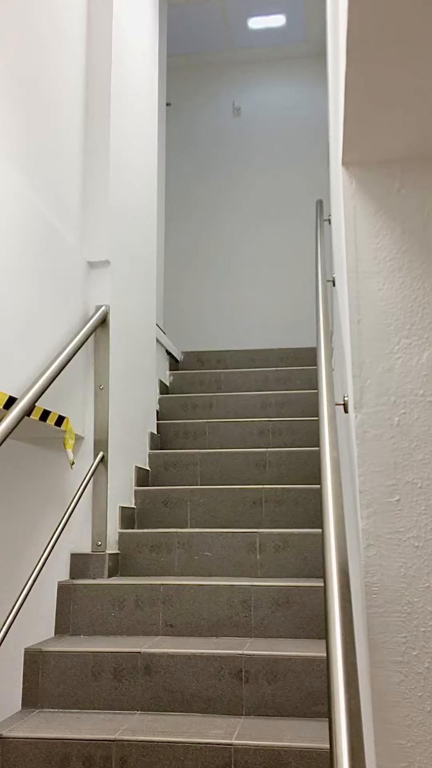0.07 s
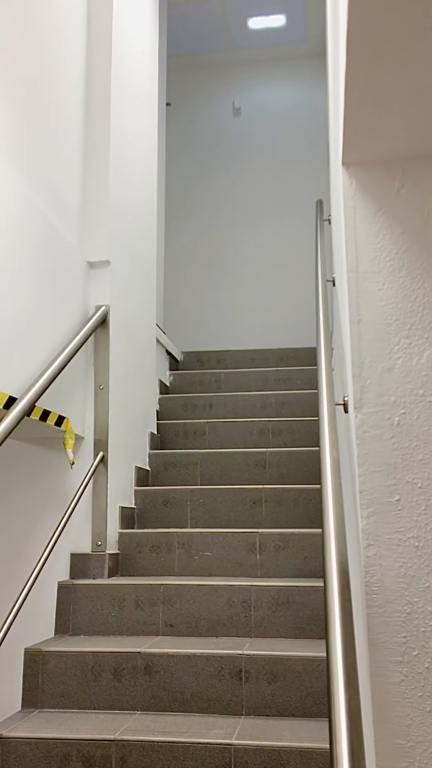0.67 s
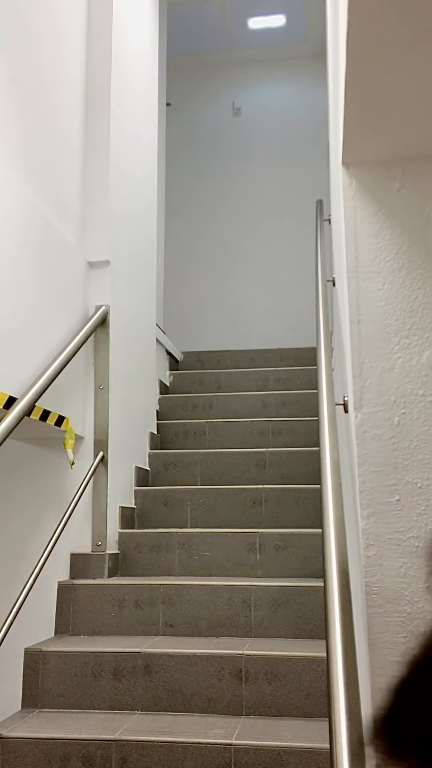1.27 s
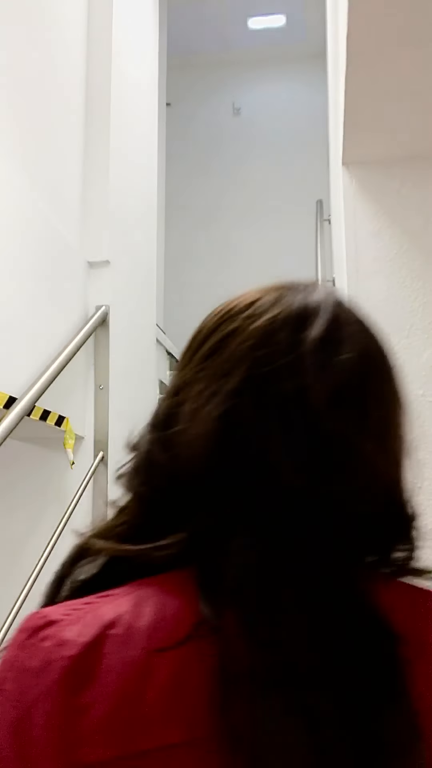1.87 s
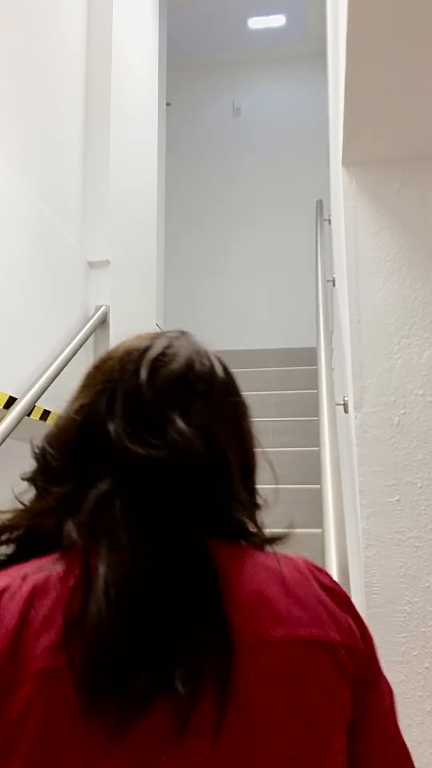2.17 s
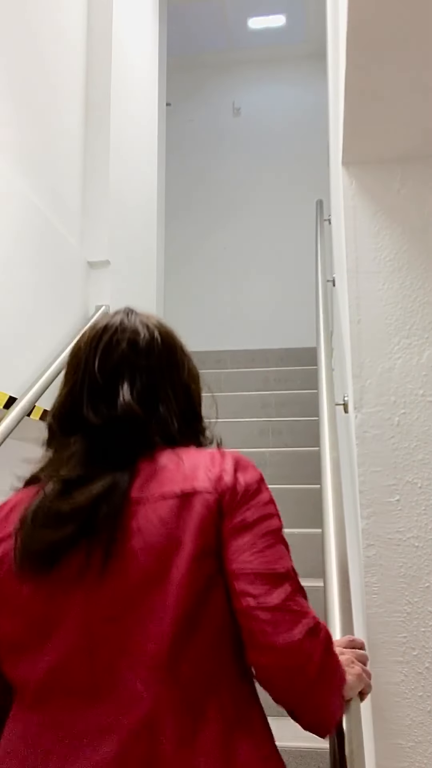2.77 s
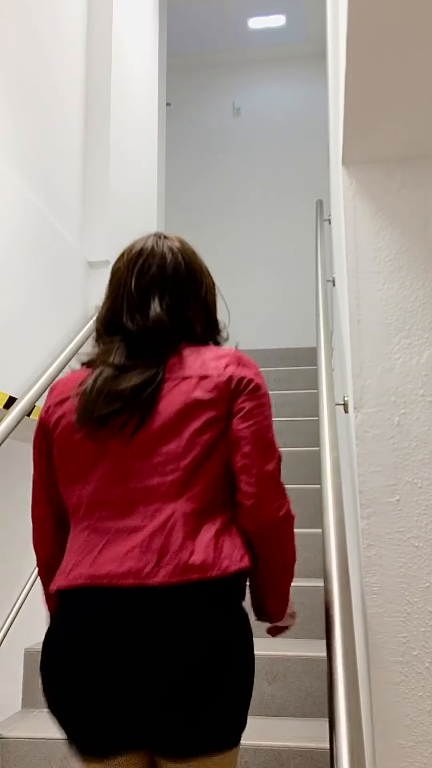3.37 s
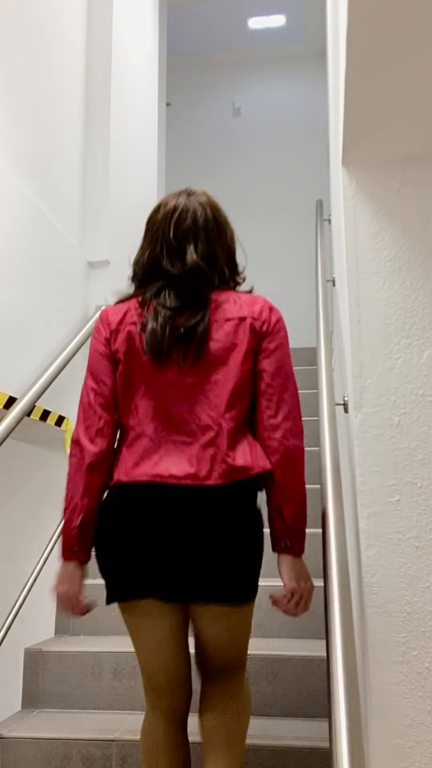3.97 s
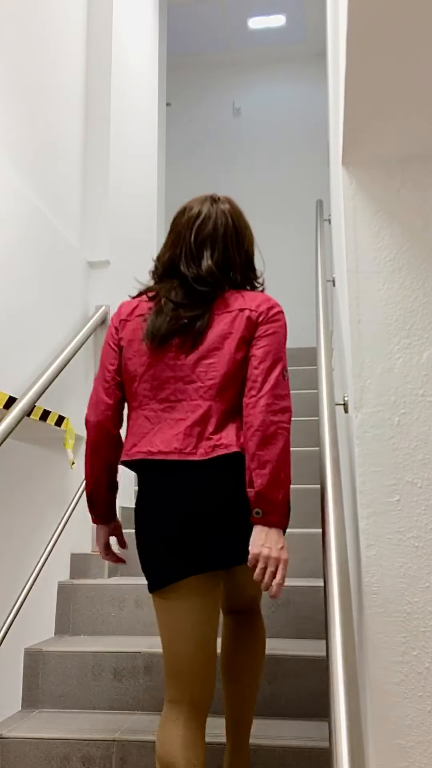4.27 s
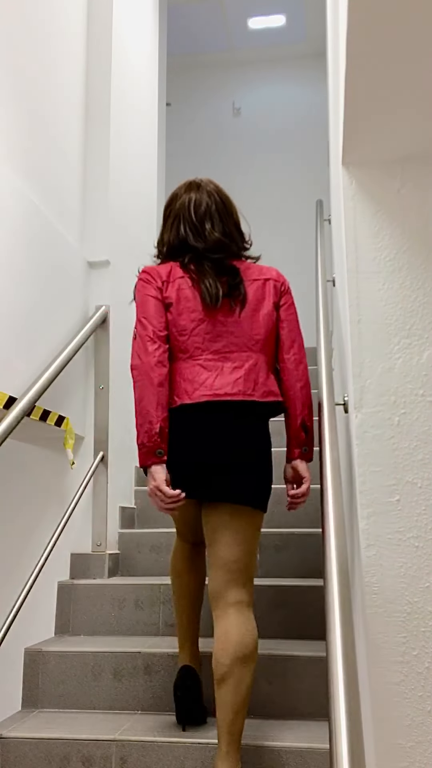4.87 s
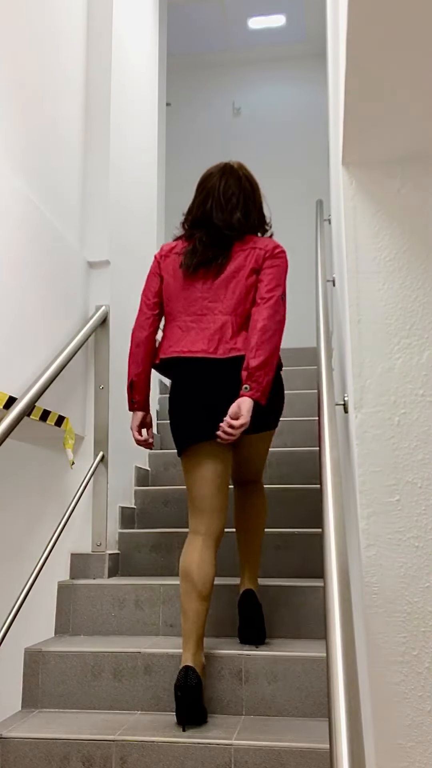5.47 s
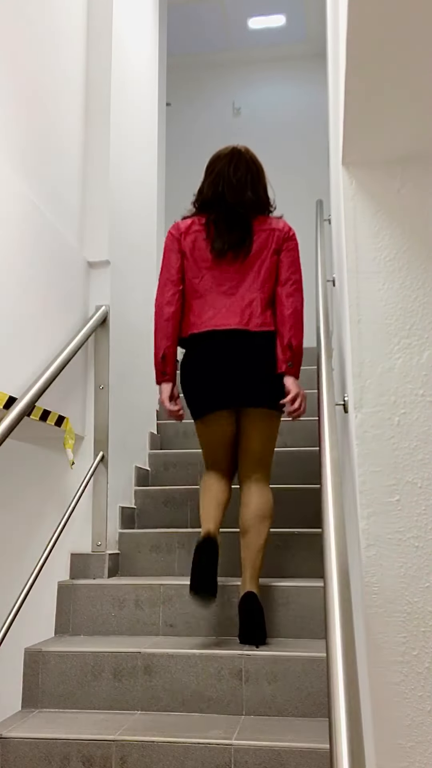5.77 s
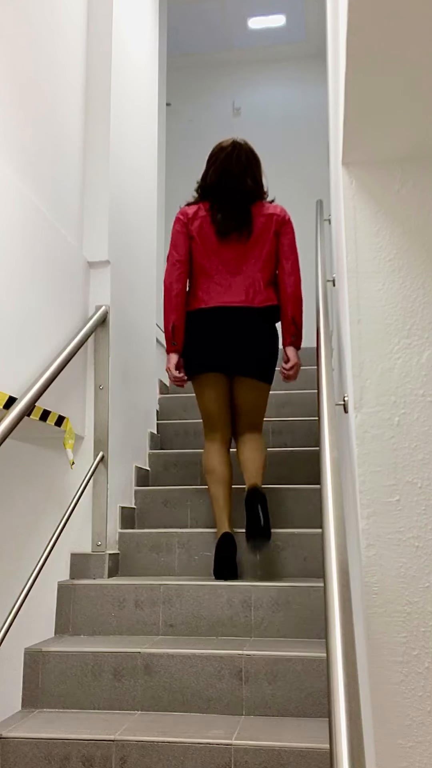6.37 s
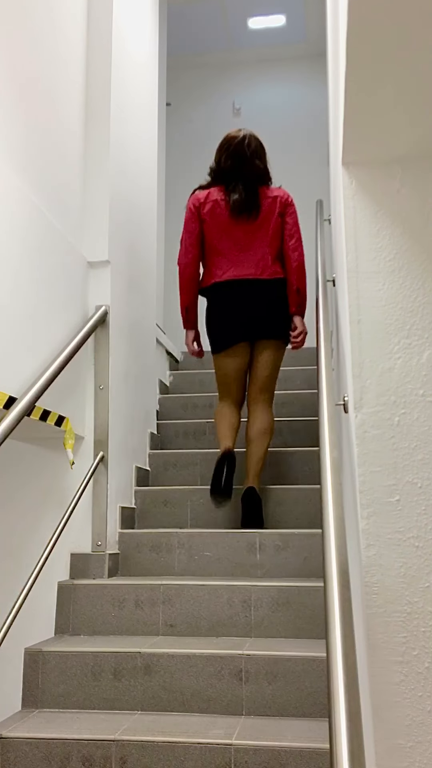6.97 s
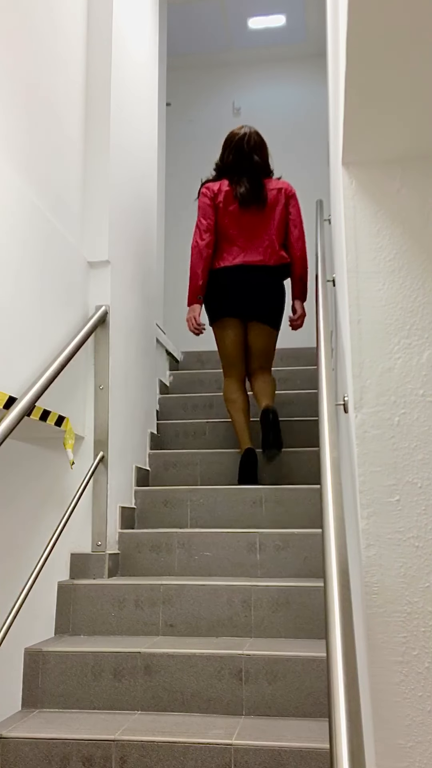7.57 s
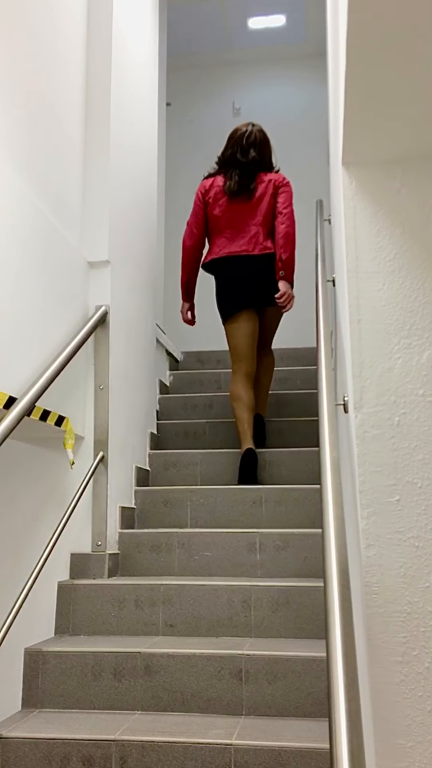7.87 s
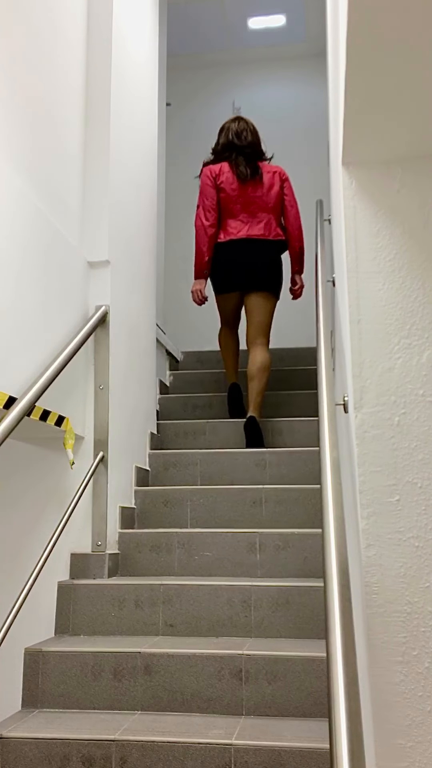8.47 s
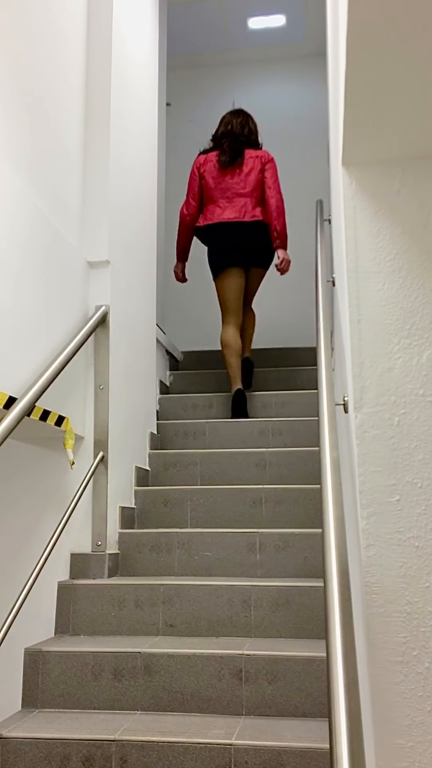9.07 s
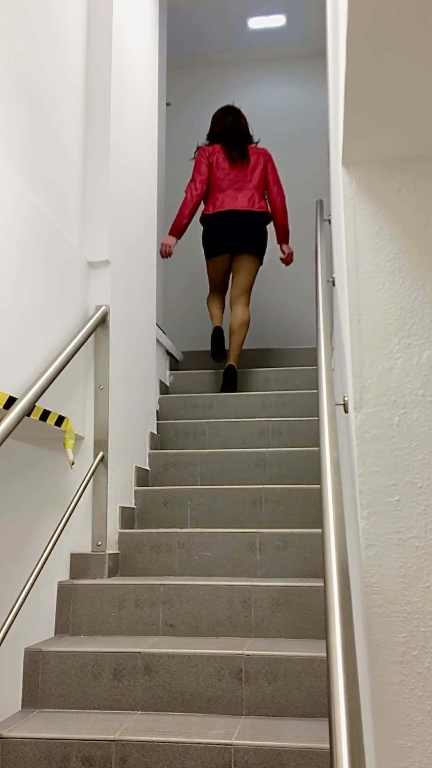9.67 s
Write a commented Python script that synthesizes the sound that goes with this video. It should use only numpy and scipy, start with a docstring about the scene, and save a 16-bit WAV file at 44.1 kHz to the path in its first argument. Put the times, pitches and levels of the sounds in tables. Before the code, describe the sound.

High heels pass close by and climb hard stairs in an echoing stairwell, with clothes swishing over a low hum.

```python
"""High heels pass close by and climb tiled concrete stairs in a hard, ringing stairwell.
Each footfall is a tap, sole thud plus heel click, and a second contact as the shoe settles.
Soles scuff the tile, clothes swish with each stride, and shoes and clothing give off small ticks.
A hand slides along the steel rail and makes it hiss. Under it all lies the building's low hum."""
import sys
import numpy as np
from scipy import signal
from scipy.fft import rfft, irfft, next_fast_len
from scipy.io import wavfile
from scipy.ndimage import uniform_filter1d

SR = 44100
rng = np.random.default_rng(int(sys.argv[2]) if len(sys.argv) > 2 else 0)


def wrap_up_sound(samples):
    """Save the sound to the file named by the first command line argument, as 16-bit audio."""
    columns = np.atleast_2d(samples).T
    # keep every value between -1 and 1, then stretch to whole-number steps
    tamed = np.clip(columns, -1, 1)
    steps = np.round(tamed * 32767).astype(np.int16)
    wavfile.write(sys.argv[1], SR, steps)


N = 428652
T = np.arange(N) / SR

# The stairwell's reverb tail. Each row: frequency in Hz, seconds to die away by 60 dB.
REVERB_TIMES = [(100, 0.5), (300, 0.88), (700, 1), (1400, 0.85), (2500, 0.87), (5000, 0.75), (9000, 0.43),
                (15000, 0.52)]
# How far the shoes are from the listener. Each row: time in seconds, distance in metres.
DISTANCE_PATH = [(1, 0.49), (3, 3.8), (3.6, 1.1), (5.4, 2.4), (9.1, 6.8)]
# Tone of the building's air. Each row: frequency in Hz, level in dB.
AIR_EQ = [(15, -49), (25, -5), (42, -1), (66, 3.5), (80, -16), (129, -4.5), (215, -5), (300, -11),
          (430, -16), (895, -19), (1500, -21), (3260, -28.5), (4500, -33), (7000, -33), (15500, -37.5)]
# Slow drift of the air noise. Each row: time in seconds, level in dB.
AIR_FADER = [(0, -52.5), (.9, -49.5), (1.6, -52), (3.4, -49), (6, -51.5), (9.7, -52.5)]
# Swells of the shaft's drone. Each row: centre in seconds, level in dB, half length in seconds.
DRONE_SWELLS = [(3.36, -44, 0.086), (3.65, -33, .05), (4.75, -37, 0.13), (6.5, -47.5, .3), (8.0, -35, 0.14)]
# A deep passing rumble. Its row: centre in seconds, level in dB, half length in seconds.
RUMBLE_SWELL = [(8.2, -44.5, 0.34)]
# Small knocks of shoes and clothing. Each row: start in seconds, level in dB, centre in Hz.
SMALL_TICKS = [(0.249, -10.5, 3730), (0.252, -15.5, 9000), (0.312, -10, 1360), (.445, -19.5, 3950),
               (.835, -10, 800), (1.192, -12.5, 3530), (1.199, -26, 6000), (1.819, -5, 690),
               (2.476, 11, 344), (2.983, -9, 2270), (3.243, -17, 8000), (3.592, 19.5, 292),
               (4.798, -18, 7450), (6.124, -25, 8000), (8.466, -27, 5940), (9.649, -18, 9200)]
# Clothes swish and brush as the walker passes close by and turns onto the landing.
# Each row: centre in seconds, level in dB, half length in seconds.
CLOTH_BRUSHES = [(.85, -60, .09), (1.382, -55, 0.16), (1.76, -56, 0.11), (1.85, -46, 0.074),
                 (1.99, -55.5, .17), (2.496, -54.5, 0.091), (2.765, -53.5, 0.094), (3.04, -60, 0.16),
                 (9.55, -52.5, .11)]
# The jacket's bright sheen. Each row: time in seconds, strength from 0 to 1.
SHEEN_FADER = [(1.1, 0), (1.7, 1), (3, 1), (4, 0), (7.5, 0.9), (8.2, .15)]
# Tone of rubbing fabric. Each row: frequency in Hz, level in dB.
CLOTH_EQ = [(300, -20), (1200, 7.5), (2800, 1.5), (4500, -1), (9000, 0), (12000, -2), (16000, -3)]
# The steps. Each row: start in seconds, thud in dB, thud cut-off in Hz, heel click in dB, low ring in Hz,
# its lift in dB, high ring in Hz, settling delay in seconds, settling in dB relative to the tap.
STEPS = [(1.057, 15, 212, -37, 330, 11, 820, 0.00795, -4), (1.734, 19, 147, -22, 267, 7.5, 530, 0.076, -9),
         (2.306, 6, 377, 5, 240, 9.5, 1250, .043, -20), (2.971, 15.5, 190, -3, 224, -0.5, 518, .014, 3.5),
         (3.602, 30, 520, 1.5, 292, 10.5, 694, 0.012, -10),
         (4.216, 13, 571, 8.5, 280, 12, 1316, .013, -2.5), (4.773, 31, 252, -5, 379, 6, 568, .015, -8),
         (5.417, 22.5, 416, 8.5, 230, 5, 796, .007, 0.5), (5.957, 18.5, 441, -2, 303.5, 16, 566, .019, 0.5),
         (6.628, 19.5, 440, 4.5, 224, 3, 1200, .0045, 1.5), (7.175, 24.5, 223, 4, 351, 7.5, 625, .028, 2.5),
         (7.853, 13.5, 171, -2, 291, 8, 710, 0.013, 3.5), (8.492, 15, 215, 4.5, 243, 5.5, 1900, .02, 0),
         (9.096, 22.8, 235, -8, 329, 5, 430, 0.031, 4)]
# Sole on the tread, before the contact softens it. Each row: frequency in Hz, level in dB.
THUD_EQ = [(25, -26), (70, -24.5), (130, -13), (320, 1), (650, 6), (1200, 10.5), (2400, 0), (5000, -4),
           (16000, 15)]
# Heel tip on the tile. Each row: frequency in Hz, level in dB.
CLICK_EQ = [(25, -45), (130, 4.5), (320, -8), (650, -0.5), (1200, 5.5), (2400, 0), (4200, -8.5),
            (5600, -11), (7000, -14), (11000, -19.5), (16000, -26)]
# The heel tip's first touch in a hard click. Each row: frequency in Hz, level in dB.
SNAP_EQ = [(25, -40), (700, -22), (2500, -4), (5500, -8), (9000, -9), (12000, -18), (16000, -25)]
# Modes and nulls of the flight and its shaft. Each row: centre in Hz, width in Hz, lift in dB.
STAIR_MODES = [(98, 27, 4.5), (139, 19, 10), (187, 33, -9), (223, 37, 7.5), (284.3, 52, -7.5),
               (310.8, 32, 7), (389.6, 7.2, 5.5), (468, 18, -4.5), (662.5, 24, 6), (745, 8.5, 2.5),
               (807, 7.2, 2), (1025, 36, 3.5), (1113, 22, 0.5), (1316, 75, 0)]
# The heel's stem, rung by one square strike. Each row: centre in Hz, width in Hz, lift in dB.
HEEL_MODES = [(610, 52, 4.5), (1034, 53, 11), (1790, 106, 16), (2240, 110, 11.5), (2820, 72, 3),
              (3020, 76, 14)]
# The hand's stroke along the rail. Each row: time in seconds, level in dB.
SLIDE_FADER = [(1.9, -66), (2.02, -57), (2.1, -48.5), (2.17, -38), (2.24, -43.5), (2.3, -42.5), (2.4, -45),
               (2.55, -77)]
# Tone of a hand rubbing steel. Each row: frequency in Hz, level in dB.
RUB_EQ = [(900, -55), (1500, -12), (2600, -13), (5000, -15.5), (9000, -17.5), (10500, -25), (16000, -24)]
# Resonances of the steel tube. Each row: centre in Hz, width in Hz, lift in dB.
RAIL_MODES = [(1590, 120, -10), (3240, 27, 11.5), (4150, 140, 15.5), (5670, 440, 4.5), (7980, 170, 9),
              (8650, 300, 4), (12700, 150, 10), (13450, 300, 9)]
# Soles scraping. Each row: peak in seconds, level in dB, decay in seconds, tilt in dB per octave.
SOLE_SCUFFS = [(2.339, -28.5, 0.029, 0.5), (3.001, -48, 0.1, 10), (4.332, -42.5, .009, 14),
               (4.939, -57, .009, 13), (6.707, -44.5, 0.022, 8.5), (7.212, -41, .035, 12),
               (7.94, -53, 0.056, 8), (9.18, -47, 0.062, -8.5)]
# Tone of gritty friction on tile. Each row: frequency in Hz, level in dB.
GRIT_EQ = [(200, -49.5), (900, -25.5), (2000, 0), (4000, 0), (6000, 1), (9000, -5.5), (12000, -10.5),
           (16000, -20)]
# The microphone's colour. Each row: frequency in Hz, gain in dB.
MIC_EQ = [(20, -15), (36, -2), (4300, 0), (4950, -3), (5700, -1), (6600, -2), (7450, -4), (8300, -3),
          (9850, -3), (10300, -8.5), (11200, -3.5), (16000, -7)]


def amp(db):
    """Decibels to gain."""
    return 10 ** (np.asarray(db) / 20)


def unit(x):
    """Scale to rms 1."""
    return x / np.sqrt(np.mean(x ** 2) + 1e-20)


def along(points, hz):
    """Read a curve of (Hz, value) points on a log frequency axis."""
    freqs, values = np.transpose(points)
    return np.interp(np.log(hz + 1), np.log(freqs + 1), values)


def lifts(peaks, hz):
    """The dB that resonances add to a spectrum."""
    return sum(db / (1 + (2 * (hz - centre) / width) ** 2) for centre, width, db in peaks)


def softened(hz, cutoff_hz, steepness=4.48):
    """The dB that a soft contact takes from the treble."""
    return -10 * np.log10(1 + (hz / cutoff_hz) ** steepness)


def filtered(x, response):
    """Filter x with a gain given as a function of frequency."""
    size = next_fast_len(len(x) + 8192)
    return irfft(rfft(x, size) * response(np.fft.rfftfreq(size, 1 / SR)), size)[:len(x)]


def noise(shape_db, size=N):
    """Noise of rms 1 with a given dB spectrum."""
    return unit(filtered(rng.standard_normal(size), lambda hz: amp(shape_db(hz))))


def flutter(smooth_samples, size=N):
    """A random wobble of rms 1; more smoothing makes it slower."""
    return unit(uniform_filter1d(rng.standard_normal(size), size=smooth_samples))


def blow(shape_db, size=16384):
    """A sharp-fronted, minimum-phase pulse with a given dB spectrum."""
    cepstrum = irfft(np.log(amp(shape_db(np.fft.rfftfreq(size, 1 / SR)))))
    cepstrum[1:size // 2] *= 2
    cepstrum[size // 2 + 1:] = 0
    return irfft(np.exp(rfft(cepstrum)))


def swells(rows):
    """Gain of bell-shaped swells whose powers add where they overlap."""
    powers = (amp(2 * db) * np.exp(-np.minimum(2 * ((T - s) / half) ** 2, 50)) for s, db, half in rows)
    return np.sqrt(sum(powers))


def add(track, s, sound):
    """Mix a sound into the track at s seconds."""
    part = track[max(round(s * SR), 0):][:len(sound)]
    part += sound[:len(part)]


def distance(s):
    """Metres from the shoes to the listener at s seconds."""
    return np.interp(s, *np.transpose(DISTANCE_PATH))


def stairwell(direct_db, walls_db=-1, build_s=0.0036, walls_t60_s=0.5, scatter_s=0.0037, echoes=40):
    """The stairwell's impulse response from one spot: direct sound, near walls, diffuse tail."""
    age = np.arange(SR) / SR
    hz, t, spectra = signal.stft(rng.standard_normal(SR), SR, nperseg=256)
    decay = amp(-60 * t / along(REVERB_TIMES, hz)[:, None])
    tail = signal.istft(spectra * decay, SR, nperseg=256)[1][:SR]
    tail *= 1 - np.exp(-age / build_s)
    delays = .003 + .06 * rng.random(echoes) ** 2
    echo_gains = rng.standard_normal(echoes) * amp(-60 * delays / walls_t60_s)
    walls = np.bincount((delays * SR).astype(int), echo_gains, SR)
    direct = rng.standard_normal(SR) * np.exp(-age / scatter_s)  # the direct sound is a brief crunch, not a single click
    paths = unit(tail) + amp(walls_db) * unit(walls) + amp(direct_db - 4.5) * unit(direct)
    # the echo is evened out so its colour comes from the steps and stair modes; only fine ripple stays
    power = np.abs(uniform_filter1d(np.abs(rfft(paths)) ** 2, 90))  # smoothed over 90 Hz
    flatten = blow(lambda f: -10 * np.log10(np.interp(f, np.arange(len(power)), power)))
    return signal.fftconvolve(paths, flatten)[:SR]


def building(drone_hz=102, drone_rest_db=-53, rumble_hz=66):
    """The bed: air noise, the shaft droning and swelling at its lowest resonance, one deep rumble."""
    def band(centre_hz, width_hz):
        return noise(lambda hz: -20 * np.log10(1 + (2 * (hz - centre_hz) / width_hz) ** 2))

    air = amp(np.interp(T, *np.transpose(AIR_FADER))) * noise(lambda hz: along(AIR_EQ, hz))
    drone = np.hypot(amp(drone_rest_db), swells(DRONE_SWELLS)) * band(drone_hz, width_hz=17)
    rumble = swells(RUMBLE_SWELL) * band(rumble_hz, width_hz=28)
    return air + drone + rumble


def ticks(skirt_db=7):
    """Light single contacts of shoes and clothing, each around one broad resonance."""
    out = np.zeros(N)
    for s, db, centre_hz in SMALL_TICKS:
        tick = blow(lambda hz: db - np.minimum(skirt_db * np.log2((hz + 1) / centre_hz) ** 2, 60))
        add(out, s, tick)
    return signal.fftconvolve(out, stairwell(direct_db=6))[:N]


def clothes(climb_from_s=2.9, last_stride_s=0.73, swish_db=-51.5, db_per_m=-0.64, sheen_hz=13000):
    """Fabric rubs in passing, once a stride on the climb, and on the landing; the jacket adds sheen."""
    steps = np.array([s for s, *_ in STEPS if s > climb_from_s])
    strides = np.append(np.diff(steps), last_stride_s)
    legs_pass = steps + .585 * strides  # just after mid-stride
    swishes = [(s, swish_db + db_per_m * distance(s), 0.1) for s in legs_pass]
    strokes = swells([*CLOTH_BRUSHES, *swishes])
    grains = unit(amp(0.5 * flutter(120)))
    bright_hiss = noise(lambda hz: -20 * np.log10(1 + (sheen_hz / (hz + 1)) ** 2))
    sheen = np.interp(T, *np.transpose(SHEEN_FADER)) * bright_hiss
    fabric = noise(lambda hz: along(CLOTH_EQ, hz))
    return strokes * grains * (fabric + sheen)


def footsteps(square_strike_s=4.773, low_width_hz=50, high_q=9, hard_click_db=10):
    """The sole thuds and the heel clicks, then the shoe settles; each stair rings differently."""
    out = np.zeros(N)
    snap = blow(lambda hz: along(SNAP_EQ, hz))
    for s, thud_db, cutoff_hz, click_db, low_hz, low_db, high_hz, delay, settle_db in STEPS:
        metres = distance(s)
        high_db = 5 + 0.18 * max(click_db, 0)  # a hard click brings out the upper ring
        modes = [*STAIR_MODES, (low_hz, low_width_hz, low_db), (high_hz, high_hz / high_q, high_db)]
        if s == square_strike_s:
            modes.extend(HEEL_MODES)

        def tap(hz):
            softness = softened(hz, cutoff_hz) - softened(320, cutoff_hz)  # pivots at 320 Hz
            sole = thud_db + along(THUD_EQ, hz) + softness
            tip = click_db + along(CLICK_EQ, hz) - 0.77 * metres * hz / 8000  # farther is duller
            return 20 * np.log10(np.hypot(amp(sole), amp(tip))) + lifts(modes, hz)

        def settling(hz):
            settle_cutoff_hz = 6000 * .01 / delay  # slower is duller
            return tap(hz) + settle_db + softened(hz, settle_cutoff_hz, steepness=1.4)

        share = 1 / np.hypot(1, amp(settle_db))  # landing and settling share the step's energy
        tap_direct_db = -20 * np.log10(metres)
        contacts = [(s, tap, tap_direct_db), (s + delay, settling, tap_direct_db + 9.5)]
        for start, shape_db, direct_db in contacts:
            # from farther off, single reflections stand out less and the echoes take longer to gather
            paths = stairwell(direct_db, walls_db=1 - 0.76 * metres, build_s=0.0018 * metres)
            add(out, start, share * signal.fftconvolve(blow(shape_db), paths))
        # the snap stays dry, guided down the narrow shaft, and stands out only on hard clicks
        snap_db = 2.2 * (click_db - hard_click_db) - 2.4 * metres
        add(out, s, amp(snap_db) * snap)
    return out


def handrail(judder_db=2):
    """A sliding hand judders and makes the steel tube hiss at its resonances; the stairwell rings on."""
    stroke_db = np.interp(T, *np.transpose(SLIDE_FADER), left=-120, right=-120)
    level = amp(stroke_db + judder_db * flutter(400))
    hiss = noise(lambda hz: along(RUB_EQ, hz) + lifts(RAIL_MODES, hz))
    return signal.fftconvolve(level * hiss, stairwell(direct_db=9.5))[:N]


def scuffs(grain_db=3.0, rise_over_decay=0.29, size=16384):
    """A sole twists on the tile: a short burst of gritty friction."""
    out = np.zeros(N)
    t = (np.arange(size) - size // 4) / SR  # zero at the peak
    for s, db, decay_s, tilt_db in SOLE_SCUFFS:
        grains = amp(grain_db * flutter(50, size))
        hiss = noise(lambda hz: along(GRIT_EQ, hz) + tilt_db * np.log2(hz + 1), size)
        stroke = np.exp(np.where(t < 0, t / (rise_over_decay * decay_s), -t / decay_s))
        add(out, s + t[0], amp(db) * stroke * unit(grains * hiss))
    return signal.fftconvolve(out, stairwell(direct_db=9.0))[:N]


def scene():
    """Everything heard at the foot of the stairs, in mono."""
    return (footsteps() + ticks() + scuffs() + clothes() + handrail() + building())[None]


def record(dry, top_hz=15800):
    """The microphone port notches the treble; nothing is kept above the band limit."""
    return filtered(dry[0], lambda hz: amp(along(MIC_EQ, hz)) * (hz < top_hz))[None]


dry = scene()
out = record(dry)
wrap_up_sound(out)
```